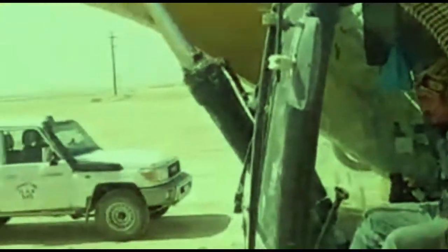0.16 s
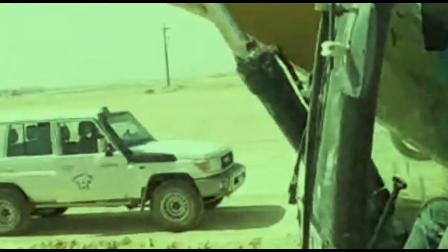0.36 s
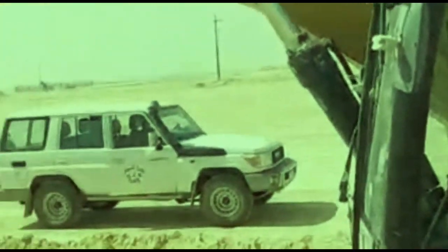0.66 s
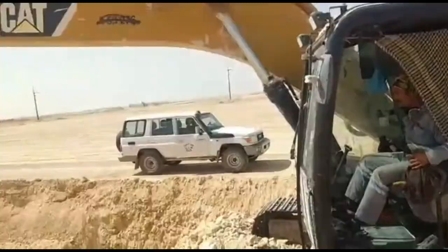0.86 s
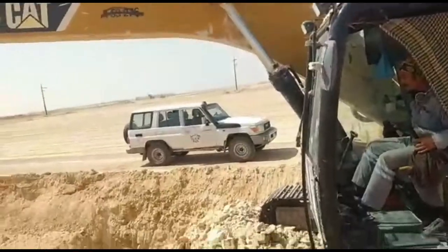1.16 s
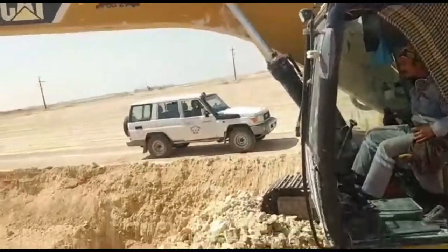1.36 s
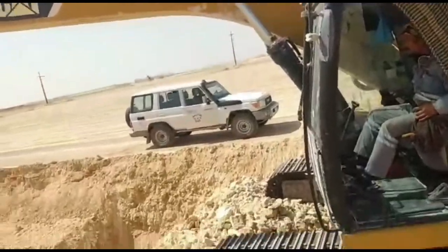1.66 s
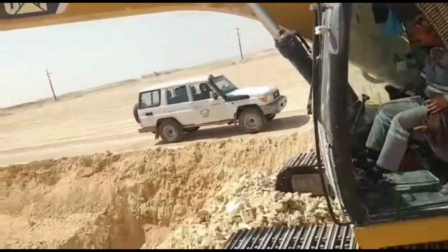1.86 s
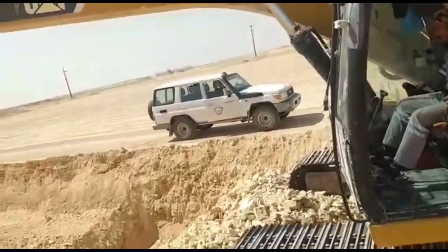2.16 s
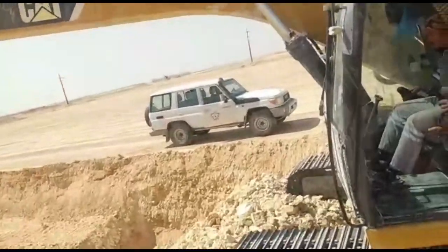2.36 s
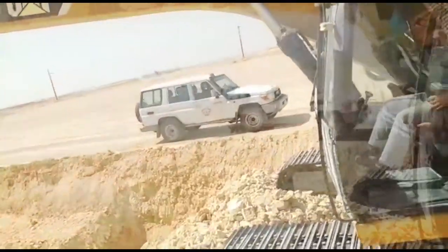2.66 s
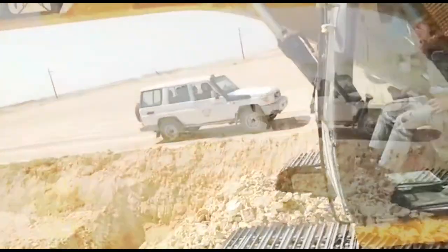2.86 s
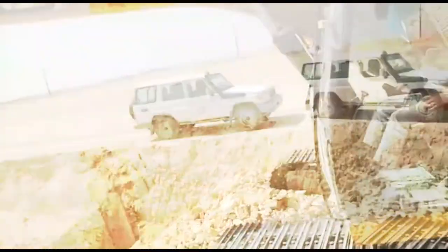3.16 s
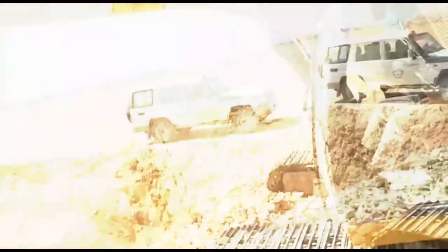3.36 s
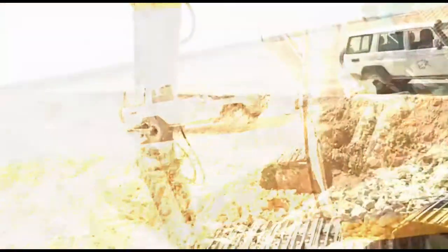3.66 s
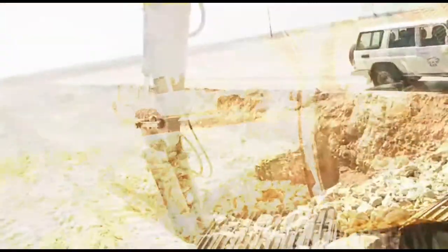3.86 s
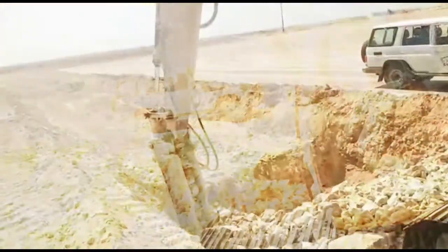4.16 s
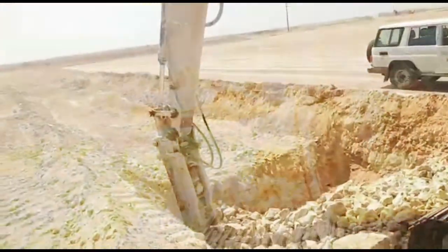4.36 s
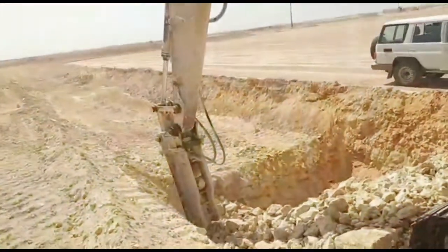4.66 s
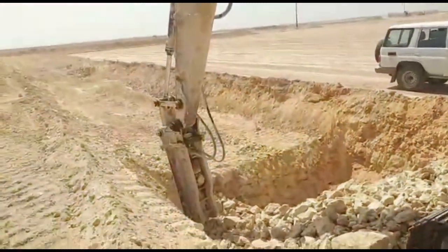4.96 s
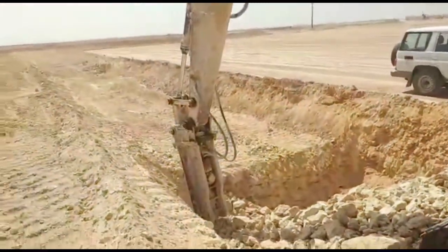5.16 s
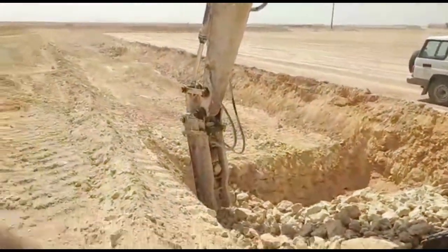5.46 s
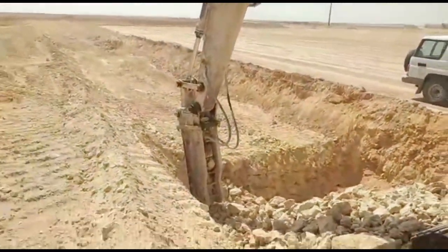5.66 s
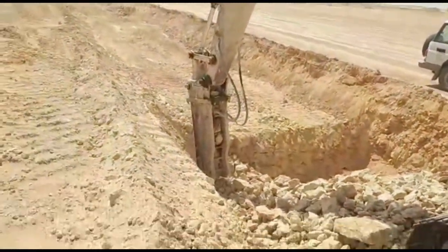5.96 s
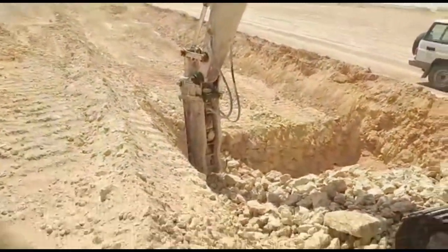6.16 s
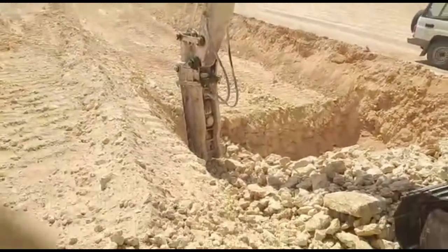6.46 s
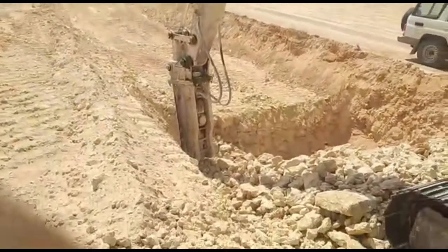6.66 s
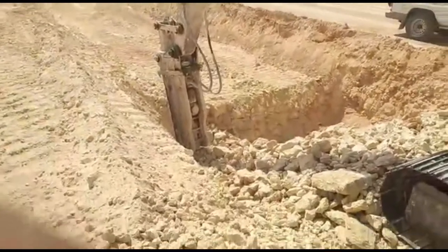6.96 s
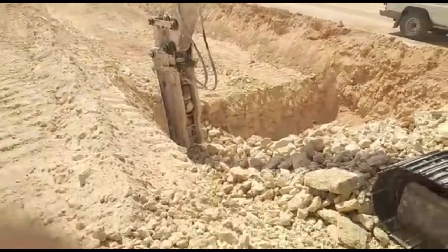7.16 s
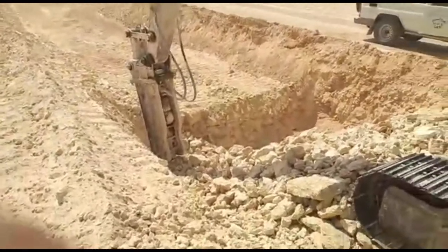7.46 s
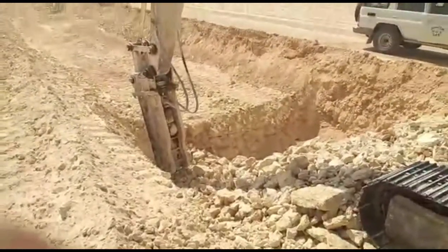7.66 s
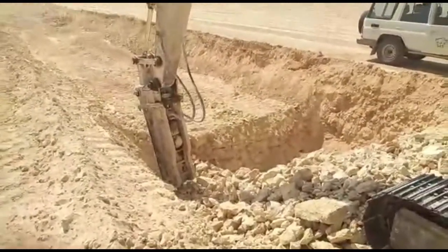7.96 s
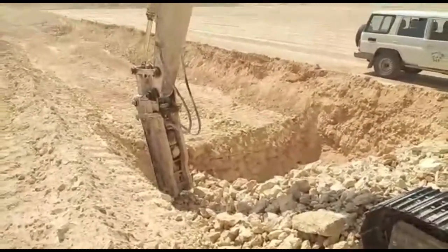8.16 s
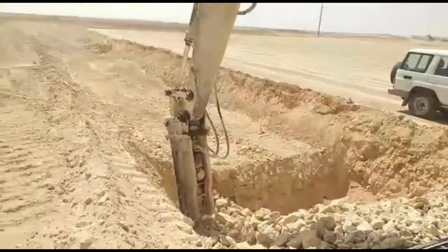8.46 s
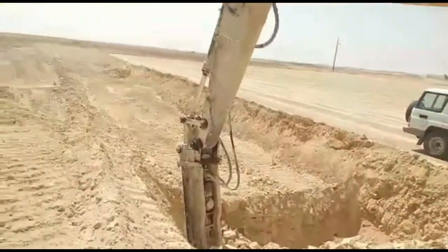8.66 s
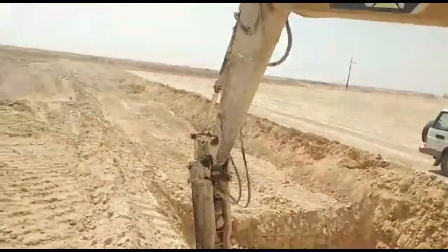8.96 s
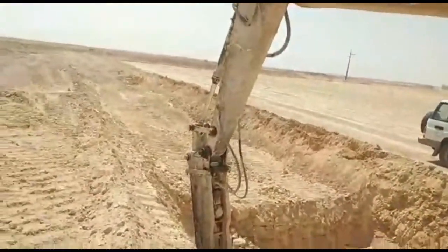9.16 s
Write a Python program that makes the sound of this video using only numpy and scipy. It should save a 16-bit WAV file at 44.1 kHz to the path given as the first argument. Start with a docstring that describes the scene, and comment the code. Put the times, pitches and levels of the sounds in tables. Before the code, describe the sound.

Over a steady diesel and hydraulic rush, a rock breaker clangs slowly, rattles fast for four seconds, rests, squeals and strikes again.

```python
"""A hydraulic breaker on an excavator hammers rock in an open pit, its diesel and hydraulics running throughout.
Single blows lead into a run of nine a second; each cracks, rings housing and chisel, and thumps the ground.
Dull low thuds fall just before the run, within it and among the last blows; in the run the chisel rebounds
and steel squeals. Then chips tick, loose rock shifts, and more squeals lead to four last blows. Struck modes,
shaped noise and firing-rate tones reach two microphones turning past the machine, softly overloaded."""
import sys
import numpy as np
from scipy import signal
from scipy.fft import rfft, irfft, next_fast_len
from scipy.io import wavfile
from scipy.ndimage import map_coordinates

SR = 44100
rng = np.random.default_rng(int(sys.argv[2]) if len(sys.argv) > 2 else 0)


def wav_record(signal):
    """Record a signal, one row per channel, as 16-bit PCM in the file named by sys.argv[1]."""
    frames = np.transpose(np.atleast_2d(signal))
    bounded = np.clip(frames, -1, 1)
    # unit amplitude maps onto the largest positive 16-bit level
    quanta = np.round(bounded * 32767).astype(np.int16)
    wavfile.write(sys.argv[1], SR, quanta)


N = 410130
RING = np.arange(16384) / SR  # time axis of one struck sound, s
EDGE_HZ = 15900  # upper band limit

# Piston blows. Each row: time in seconds, then relative levels in dB of strength, chisel ring, retainer clink.
BLOWS = [(.0288, -8, -14.5, -31), (.1635, -8, -26, -34), (.2897, -6, -17.5, -29), (.4435, -6.5, -20.5, -14),
         (.6794, -11, -22, -42), (1.0645, -9, -25, -17), (1.3109, -8, -23, -9.5), (1.7629, -8.5, -30, -25),
         (1.9614, -5.5, -20.5, -30), (2.1244, -6, -32, -29), (2.1994, -6.5, -18.5, -17),
         (2.3104, -7, -17, -18), (2.4184, -8, -24, -25), (2.5242, -9, -20, -24), (2.6279, -9.5, -22, -18),
         (2.7434, -8, -15, -12), (2.8569, -7, -14, -12), (2.9672, -8, -12, -19), (3.0719, -8, -22, -26),
         (3.1787, -6.5, -33, -35), (3.2874, -6, -18, -20), (3.3947, -5.5, -18, -19),
         (3.5029, -5, -20, -12.5), (3.6114, -7, -18, -21), (3.7177, -7, -19, -15), (3.8287, -6, -21, -21),
         (3.9367, -7, -24, -18), (4.0464, -7, -26, -26), (4.1554, -6.5, -22, -25), (4.2657, -7, -28, -17),
         (4.3744, -7, -25, -19), (4.4892, -7, -15, -15), (4.5989, -7, -24, -16.5), (4.7102, -8, -24, -22),
         (4.8174, -5, -24, -15), (4.9342, -5, -16, -12), (5.0414, -6, -19, -18), (5.1544, -4.5, -19, -29),
         (5.2649, -5, -24, -31), (5.3773, -4.5, -33, -36), (5.4879, -4.5, -14, -35), (5.6014, -4, -11, -30),
         (5.7104, -4.5, -12, -27), (5.8227, -5, -12, -27), (5.9309, -3.5, -17, -25),
         (6.0457, -4, -29, -13.5), (6.1564, -4, -13.5, -19), (6.3298, -4.5, -8, -14),
         (8.7814, -3.5, -27, -18), (8.9369, -3.5, -9, -32), (9.0637, -4.5, -10.5, -31),
         (9.1881, -6, -2.5, -26)]
# Tip in the rock. Each row: time in seconds, seated hard 0-1, on loose rock 0-1,
# crack relative to the blow's strength in dB, recoil into the boom in dB.
SEATING = [(0, 0, 0.44, -12, -7), (.7, 0.16, 0.69, -24, -9), (1.9, 0.58, 0.51, -18, -5),
           (2.3, 0, .3, -14, 1), (3.3, 0.02, 0.29, -12, -3), (4.5, 0.09, 0.21, -11.5, 0.5),
           (5, 0.73, 0, -9.5, -2), (5.5, 0.97, 0.1, -11, -5), (6, 0.98, .1, -14, -6),
           (6.3, 0.7, 0.44, -16, -10), (8.8, 0.47, 0.98, -16.5, -2), (9.3, 0.7, 0.74, -10, 0)]
# Chisel modes. Each row: frequency in Hz, relative level in dB, t60 in seconds.
CHISEL_MODES = [(2504, 1.5, 0.1), (2554, -3.5, 0.18), (3682, -23, 0.087), (4670, -13.5, 0.12),
                (4780, -15, 0.046), (6400, -15, 0.092)]
# Retainer pin modes. Each row: frequency in Hz, relative level in dB, t60 in seconds.
RETAINER_MODES = [(2986, -4, 0.042), (3057, -7, 0.053), (3180, -6.5, 0.032)]
# Left-right likeness of impacts and scrapes. Each row: frequency in Hz, likeness -1..1.
BLOW_SAME = [(100, 0.6), (640, 0.63), (1400, 0.3), (2800, 0.54), (6800, 0), (15000, 0)]


def amp(db):
    """Decibels to gain."""
    return 10 ** (np.asarray(db) / 20)


def unit(x):
    """Scales to rms 1."""
    return x / np.sqrt(np.mean(x ** 2) + 1e-20)


def read(points, hz):
    """Reads a table on a log-frequency axis."""
    f, value = np.transpose(points)
    return np.interp(np.log(hz + 1), np.log(f + 1), value)


def curves(rows):
    """Interpolates each column of a time table to every sample."""
    s, *columns = np.transpose(rows)
    t = np.arange(N) / SR
    return [np.interp(t, s, column) for column in columns]


def add(mix, s, sound):
    """Mixes a sound in at time s."""
    start = max(round(s * SR), 0)
    part = mix[:, start:][:, :sound.shape[-1]]
    part += sound[..., :part.shape[1]]


def wander(size, hz):
    """Low-passed noise of rms 1, rolling off around hz."""
    spectrum = rfft(rng.standard_normal(size))
    rolloff = 1 + (np.fft.rfftfreq(size, 1 / SR) / hz) ** 4
    return unit(irfft(spectrum / rolloff, size))


def white_pair():
    """Two independent white noises, one struck sound long."""
    return rng.standard_normal((2, len(RING)))


def colour(white, spectrum, same):
    """Gives a noise pair a spectrum and a left-right likeness, at rms 1."""
    length = white.shape[1]
    size = next_fast_len(length)
    hz = np.fft.rfftfreq(size, 1 / SR)
    a, b = rfft(white, size)
    likeness = np.clip(read(same, hz), -1, 1)
    mid, side = a * np.sqrt(1 + likeness), b * np.sqrt(1 - likeness)
    pair = np.array([mid + side, mid - side]) * amp(read(spectrum, hz))
    return unit(irfft(pair, size)[:, :length])


def burst(white, spectrum, t60, rise, linger=1.):
    """Dense modes struck at once, as noise: each band has its own t60, stretched by linger."""
    hz, t, z = signal.stft(colour(white, spectrum, BLOW_SAME), SR, nperseg=256)
    band_t60 = np.maximum(read(t60, hz) * linger, .005)
    decay = amp(-60 * t / band_t60[:, None])
    noise = signal.istft(z * decay, SR, nperseg=256)[1][:, :len(RING)]
    return noise * (1 - np.exp(-(RING / rise) ** 2))


def ring(modes, phase, rise, spread=0.92, vary_db=2.5):
    """Decaying sines with random level changes; left and right phases part further at higher pitch."""
    hz, db, t60 = np.transpose(modes)[:, :, None]
    db = db + vary_db * rng.standard_normal(hz.shape)
    skew = spread * np.sqrt(hz / 1000) * (-1) ** np.arange(len(hz))[:, None]
    sides = np.array([1, -1])[:, None, None]
    angle = 2 * np.pi * (hz * RING + phase[:len(hz)]) + skew * sides  # phase in turns
    decay = amp(db - 60 * RING / t60)
    return (decay * np.sin(angle)).sum(1) * (1 - np.exp(-RING / rise))


def shaking(rise_s=0.012, fall_s=0.15):
    """Machine shake 0-1: each blow's recoil adds energy that builds up and dies away."""
    energy, t = np.zeros((1, N)), np.arange(2 * SR) / SR
    envelope = (1 - np.exp(-t / rise_s)) * np.exp(-t / fall_s)
    times, *_, recoil_db = np.transpose(SEATING)
    for s, *_ in BLOWS:
        add(energy, s, amp(np.interp(s, times, recoil_db)) ** 2 * envelope)
    return np.sqrt(energy[0] / energy.max())


def excavator(throb=0.14):
    """Firing-rate tones, pump whine and noises that swell with shaking; roar and oil rush throb per firing."""
    # Engine speed before random waver. Each row: time in seconds, firings per second.
    firing = [(0, 89.5), (.7, 88.5), (1.9, 88.5), (2.4, 87.3), (6.3, 87), (6.75, 89.3), (7.2, 87),
              (7.8, 87.4), (8.05, 89.5), (8.6, 87.3), (9.3, 87.5)]
    # Engine tones and a hydraulic hum. Each row: multiple of the firing rate, level in dB.
    engine_orders = [(.5, -38), (1, -31), (2, -40), (2.58, -29), (5.16, -41)]
    # Pump whine. Each row: multiple of the firing rate, relative level in dB.
    pump_orders = [(3, 0), (6, -4), (9, -15)]
    # Oil in valves and pump. Each row: time in seconds, then rush, hiss and pump whine levels in dB.
    hydraulics = [(0, -41, -48.5, -30), (1.8, -34.5, -45, -37.5), (4.8, -38, -46, -36),
                  (6.15, -29, -55, -42), (6.5, -28.5, -45.5, -25.5), (7.3, -30, -46, -33.5),
                  (7.7, -28.5, -41, -39), (8.5, -30, -48, -35.5), (9.3, -21.5, -36.5, -29)]
    # Noise spectra. Each row: frequency in Hz, relative level in dB per Hz.
    rumble_spectrum, roar_spectrum = [(10, 1), (30, -20), (47, -1), (70, 3), (110, -9.5), (170, -3.5),
                                      (300, -40), (2000, -96)], [(70, -13), (140, -5.5), (200, -3), (235, -1),
                                                      (300, -5.5), (400, -9), (600, -11.5), (850, -15),
                                                      (1300, -21.5), (2500, -33.5), (6000, -78),
                                                      (16000, -100)]
    rush_spectrum, hiss_spectrum = [(700, -9), (1400, -9), (1900, 4), (2400, 0.5), (3000, -19.5),
                                    (4500, -57), (12000, -80)], [(1500, -8.5), (3200, -2.5), (4500, 0), (5600, -1),
                                                  (6800, -4), (8000, -15), (9500, -17), (11500, -28),
                                                  (16000, -41)]
    # Left-right likeness of the machine. Each row: frequency in Hz, likeness -1..1.
    engine_same = [(60, 1), (290, 0.95), (700, 0.92), (2200, 0.24), (6000, 0.14), (15000, .3)]

    rush_db, hiss_db, pump_db = curves(hydraulics)
    firing_hz = curves(firing)[0] * (1 + .007 * wander(N, 8))
    turns = np.cumsum(firing_hz) / SR
    shake = shaking()

    def hum(orders):
        """Multiples of the firing rate, wavering in level."""
        total = np.zeros(N)
        for k, db in orders:
            tone = unit(np.sin(2 * np.pi * (k * turns + rng.random())))
            total += amp(db + 2 * wander(N, 10.6)) * tone
        return total

    def noise(spectrum, idle_db, shaken_db, flutter_db, flutter_hz):
        """Fluttering noise: idle level plus the power added by shaking."""
        level = np.hypot(amp(idle_db), amp(shaken_db) * shake)
        level = level * amp(flutter_db * wander(N, flutter_hz))
        return level * colour(rng.standard_normal((2, N)), spectrum, engine_same)

    rumble = noise(rumble_spectrum, idle_db=-37, shaken_db=-28, flutter_db=2.0, flutter_hz=11)
    roar = noise(roar_spectrum, idle_db=-22.5, shaken_db=-19, flutter_db=1.3, flutter_hz=23)
    rush = noise(rush_spectrum, rush_db, shaken_db=-35.5, flutter_db=1.0, flutter_hz=28)
    hiss = noise(hiss_spectrum, hiss_db, shaken_db=-40.5, flutter_db=0.9, flutter_hz=25)
    pulse = 1 + throb * np.cos(2 * np.pi * turns)
    tones = hum(engine_orders) + amp(pump_db) * hum(pump_orders)
    return tones + rumble + pulse * (roar + rush) + hiss


def breaker(fresh=0.12, drift_s=1.293, lead_s=.0032, uneven_db=3.5, tip_t60=0.049):
    """Blows excite noise and fixed-phase modes; the noise pattern drifts as the chisel sinks and shifts."""
    # Steel housing. Each row: frequency in Hz, relative level in dB, t60 in seconds,
    # dB gained when seated hard, dB gained on loose rock.
    housing_modes = [(347.5, -22, 0.27, 11.5, 12.5), (458.7, -17.5, 0.45, 0.5, 9),
                     (524, -16, 0.24, -20, 14), (616, 0.5, 0.36, -3, -4.5), (644.3, -0.5, 0.42, -3.5, -6),
                     (683, -7.5, 0.2, 3, 9), (749, -10, 0.22, 13, 3.5), (819, -20, 0.13, 0, 3),
                     (916, -12.5, 0.23, -1, 0), (1071, -18.5, 0.34, -2.5, 21.5), (1314, -7.5, 0.095, 7, -5),
                     (1388, -11.5, 0.15, 4, -1), (1507, -6, 0.088, -19, 16)]
    # Ground and boom under recoil. Each row: frequency in Hz, relative level in dB, t60 in seconds.
    ground_modes = [(33, -36, 0.22), (48.4, -20, 0.23), (121, -17, 0.13)]
    # Clang of steel and rock, crack of the tip. Each row: frequency in Hz, relative level in dB per Hz.
    clang_spectrum, crack_spectrum = [(30, -21), (120, -7.5), (250, -6.5), (420, 2.5), (560, 0.5),
                                      (780, 5.5), (1050, -1.5), (1350, -2), (1600, -2.5), (2100, -0.5),
                                      (2550, 1.5), (3000, -14), (3600, -27.5), (6000, -52)], [(1500, -31), (3000, 1.5), (3700, 2.5), (4700, 3.5),
                                                     (6500, -2), (8000, -13), (10000, -10.5),
                                                     (12000, -32.5), (16000, -46)]
    # Their decays before uneven stretching. Each row: frequency in Hz, t60 in seconds.
    clang_t60, crack_t60 = [(60, 0.21), (300, 0.32), (700, 0.31), (1400, 0.26), (2500, 0.095), (5000, 0.23)], [(3000, 0.1), (6000, 0.11), (9000, 0.048), (15000, 0.092)]

    out, fresh = np.zeros((2, N)), np.clip(fresh, 0, 1)
    seats = rng.standard_normal((16, 2, len(RING)))
    phases = rng.random((4, len(housing_modes), 1))
    damping = rng.standard_normal((16, 129))  # per seat and STFT band
    low_taper = np.minimum(np.arange(129) / 10, 1)  # lowest bands decay more evenly
    times, *columns = np.transpose(SEATING)
    for s, strength_db, chisel_db, clink_db in BLOWS:
        near = np.exp(-(np.arange(len(seats)) - s / max(drift_s, .7)) ** 2)
        pattern = unit(np.tensordot(near, seats, 1))
        white = np.sqrt(1 - fresh) * pattern + np.sqrt(fresh) * white_pair()
        linger = amp(uneven_db * unit(near @ damping) * low_taper)
        hard, loose, crack_db, recoil_db = (np.interp(s, times, column) for column in columns)
        housing = [(hz, db + hard * hard_db + loose * loose_db, t60)
                   for hz, db, t60, hard_db, loose_db in housing_modes]
        # the housing rings less when seated hard, and least on loose rock
        housing_db = 1.74 - 4 * hard - 6.5 * loose
        tip_hz = 1762 + 348 * hard + 485 * loose  # resonance against the rock

        blow = amp(strength_db - 1.0) * burst(white, clang_spectrum, clang_t60, rise=0.0018, linger=linger)
        crack = burst(white, crack_spectrum, crack_t60, rise=0.0024, linger=linger)
        blow += amp(strength_db + crack_db + 2.0) * crack
        blow += amp(strength_db + housing_db) * ring(housing, phases[0], rise=0.0075, spread=0.043)
        blow += amp(chisel_db + 4.0) * ring(CHISEL_MODES, phases[1], rise=0.0078, spread=0.35)
        blow += amp(clink_db + 7.0) * ring(RETAINER_MODES, phases[2], rise=0.0025, spread=0.37)
        tip = ring([(tip_hz, 0, tip_t60)], phases[3], rise=0.0044, spread=0.093)
        blow += amp(strength_db + 0.5) * tip
        blow += amp(recoil_db) * ring(ground_modes, phases[0], rise=0.007, spread=0)
        add(out, s - lead_s, blow)
    return out


def thuds(rise_s=0.005):
    """Dull low thuds: bursts of low decaying noise, alike on both sides."""
    # Each row: time in seconds, relative level in dB.
    thud_times = [(2.013, -5.5), (2.235, -15), (3.41, -30), (8.805, -16), (9.089, -8.5), (9.209, -10)]
    # Each row: frequency in Hz, relative level in dB per Hz.
    thud_spectrum = [(20, -13), (45, 1), (100, -4.5), (200, 4), (320, -16), (600, -32), (2000, -70)]
    # Each row: frequency in Hz, t60 in seconds.
    thud_t60 = [(40, .3), (250, .14)]
    out = np.zeros((2, N))
    for s, db in thud_times:
        thud = burst(white_pair(), thud_spectrum, thud_t60, rise=rise_s)
        add(out, s, amp(db) * thud.mean(0))
    return out


def rebounds(lead_s=.003):
    """The chisel lands one flight after its blow: clacking noise with pin and chisel modes."""
    # Each row: start in seconds, end in seconds, first flight in seconds, last flight in seconds,
    # relative level in dB.
    bouts = [(2.183, 2.439, 0.062, 0.095, -5.5), (2.59, 2.672, 0.022, .0195, -4.5),
             (3.03, 3.11, 0.06, 0.052, -10.5), (3.805, 4.187, 0.032, 0.05, -5),
             (4.229, 4.74, .053, .04, -6.5), (5.445, 6.07, 0.069, 0.073, -17.5)]
    # (Hz, relative dB per Hz)
    clack = [(200, -2.5), (650, 9.0), (1400, -5), (2600, 3.0), (3200, -0.5), (3800, -9.5),
             (6000, -18), (8000, -26.5), (10500, -32.5), (16000, -56)]
    clack_t60 = [(600, 0.34), (3000, 0.098), (9000, 0.14)]  # (Hz, s)
    out = np.zeros((2, N))
    for start, end, first, last, db in bouts:
        for s, *_ in BLOWS:
            if not start <= s <= end:
                continue
            landing_s = s + np.interp(s, [start, end], [first, last])
            knock = burst(white_pair(), clack, clack_t60, rise=0.0029)
            clink = ring(RETAINER_MODES, rng.random((len(RETAINER_MODES), 1)), rise=.002)
            steel = ring(CHISEL_MODES, rng.random((len(CHISEL_MODES), 1)), rise=0.0014)
            hit = amp(db - 3.5) * knock + amp(db - 10.5) * clink + amp(db - 13.5) * steel
            add(out, landing_s - lead_s, hit)
    return out


def squeals(waver=0.0046, flutter_db=3, rasp_db=-6, ring_t60=0.11):
    """Steel sticks and slips: unsteady harmonics plus a dry rasp, smeared by a short steel ring."""
    # Each row: start in seconds, length in seconds, pitch in Hz, relative level in dB,
    # dB lost per overtone, pitch scatter as a share.
    rubs = [(3.169, 0.12, 2622, -25.5, 8, 0.031), (6.802, 0.14, 5370, -42, 12, 0.023),
            (6.806, 0.11, 6820, -39.5, 34, 0.028), (8.452, 0.11, 5590, -34.5, 2, 0.0095),
            (8.44, 0.16, 5150, -34.5, 30, 0.0071), (8.489, 0.055, 2578, -16.5, 11, 0.053),
            (8.519, 0.06, 5515, -24.5, 19, 0.014), (8.555, 0.073, 2640, -18, 8.5, 0.023)]
    # Each row: frequency in Hz, relative level in dB per Hz.
    rasp_spectrum = [(1800, -24), (2400, 11), (3200, -4), (4200, -12), (5400, -8), (6500, -6), (8500, -14),
                     (10800, -17), (12000, -49), (16000, -44)]
    out = np.zeros((2, N))
    for s, length, hz, db, fall_db, scatter in rubs:
        size = int(length * SR)
        speed = 1 + waver * wander(len(RING), 47) + scatter * wander(len(RING), 990)
        turns = np.cumsum(hz * speed[:size]) / SR
        tone = np.zeros((2, len(turns)))
        for k in range(1, 6):
            if k * hz < EDGE_HZ:
                side_phase = np.array([[0], [k]])
                tone += amp(-fall_db * (k - 1)) * np.sin(2 * np.pi * k * turns + side_phase)
        rasp = colour(white_pair(), rasp_spectrum, BLOW_SAME)[:, :size]
        grip = amp(db + flutter_db * wander(len(RING), 130)[:size])
        grip = grip * signal.windows.tukey(len(turns), .4)
        add(out, s, grip * (unit(tone) + amp(rasp_db) * rasp))
    tail = unit(white_pair() * amp(-60 * RING / ring_t60)) / np.sqrt(len(RING))
    return 0.64 * out + 1.06 * signal.oaconvolve(out, tail, axes=1)[:, :N]


def chips(lead_s=.003):
    """Falling stone chips tick: short bursts of high noise."""
    # Each row: time in seconds, relative level in dB.
    ticks = [(6.5044, -21), (7.589, -24), (7.86, -25.5), (8.416, -17.5), (8.8864, -27)]
    # (Hz, relative dB per Hz)
    tick = [(1500, 2), (4300, 4.5), (6500, 0), (8000, -2), (9500, -10), (15000, -26)]
    tick_t60 = [(3000, 0.18), (12000, 0.19)]  # (Hz, s)
    out = np.zeros((2, N))
    for s, db in ticks:
        add(out, s - lead_s, amp(db - 7.5) * burst(white_pair(), tick, tick_t60, rise=0.00084))
    return out


def rubble(grains_per_s=2500):
    """Loose rock shifts under the tip: a crowd of random-strength grains, coloured as grinding stone."""
    # Each row: time in seconds, level in dB.
    shift = [(7.55, -57), (7.74, -23), (7.77, -18), (7.792, -6.5), (7.81, -15.5), (7.84, -20.5), (7.9, -26),
             (8.0, -40)]
    # Each row: frequency in Hz, relative level in dB per Hz.
    grind_spectrum = [(71, -32), (120, -9.5), (381, -1.5), (509, -10), (605, -2), (1040, -8.5),
                      (2380, -11.5), (3300, -23.5), (6730, -36), (12000, -69), (15600, -93), (22000, -120)]
    strength = amp(2.3 * np.minimum(rng.exponential(1, N), 4))
    struck = rng.random(N) < grains_per_s / SR  # shared by both sides
    grains = rng.standard_normal((2, N)) * strength * struck
    level_db, = curves(shift)
    return amp(level_db) * colour(grains, grind_spectrum, BLOW_SAME)


def scene():
    """Sums all sources; the left side's delay follows the microphones' turning."""
    # Each row: time in seconds, lag of the left side in ms.
    bearing = [(0, 0.41), (2.2, 0.31), (3.1, 0.16), (4.6, 0.063), (6.1, 0.019), (6.7, -0.44), (9.3, -0.34)]
    left, right = excavator() + breaker() + thuds() + rebounds() + squeals() + chips() + rubble()
    lag_samples = curves(bearing)[0] * SR / 1000
    left = map_coordinates(left, [np.arange(N) - lag_samples], order=3, mode="mirror")
    return np.array([left, right])


def record(dry):
    """Microphone port colour, soft overload, band limit."""
    # Each row: frequency in Hz, left minus right in dB.
    ports = [(100, 0.8), (700, -1.5), (1300, 0), (2400, -2.5), (3200, 4), (4400, 8), (5600, 9.5),
             (7000, 7.5), (9000, -9.5), (12000, -5)]
    size = next_fast_len(N + len(RING))
    tilt_db = read(ports, np.fft.rfftfreq(size, 1 / SR)) * np.array([[.5], [-.5]])
    heard = irfft(rfft(dry, size) * amp(tilt_db), size)[:, :N]
    squashed = heard / (1 + heard ** 4) ** (1 / 4)
    lowpass = signal.firwin(511, EDGE_HZ, window=("kaiser", 9), fs=SR)
    return signal.oaconvolve(squashed, lowpass[None], "same")


dry = scene()
out = record(dry)
wav_record(out)
```